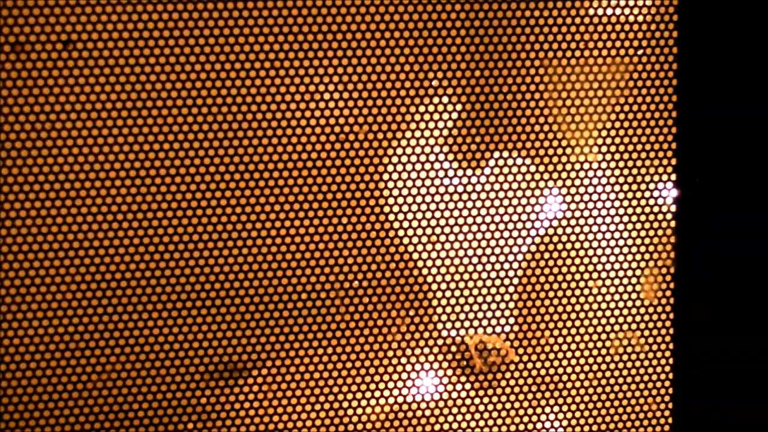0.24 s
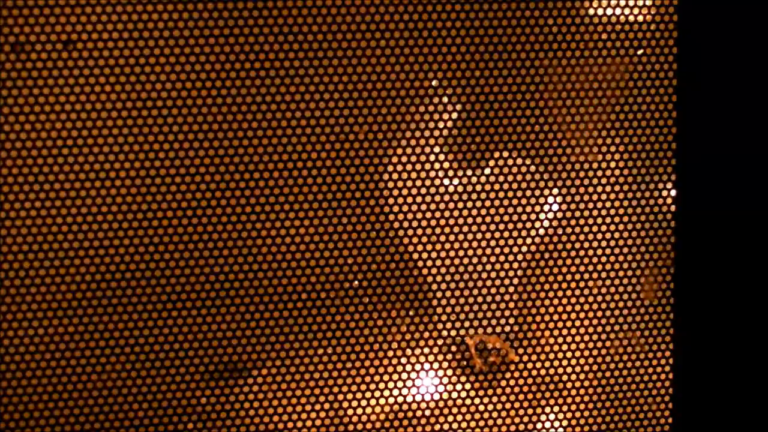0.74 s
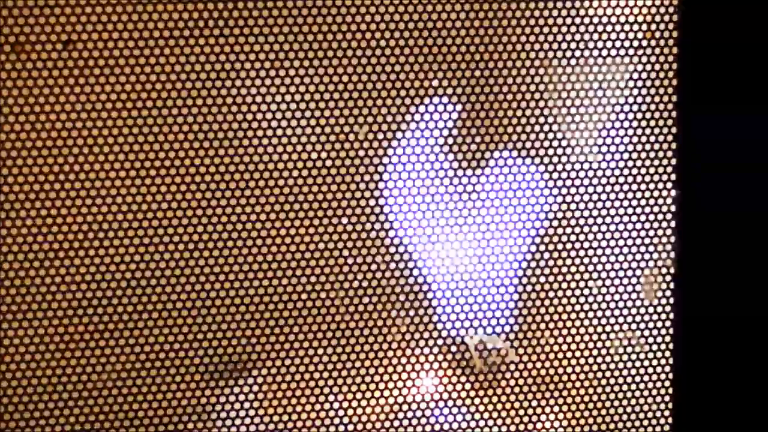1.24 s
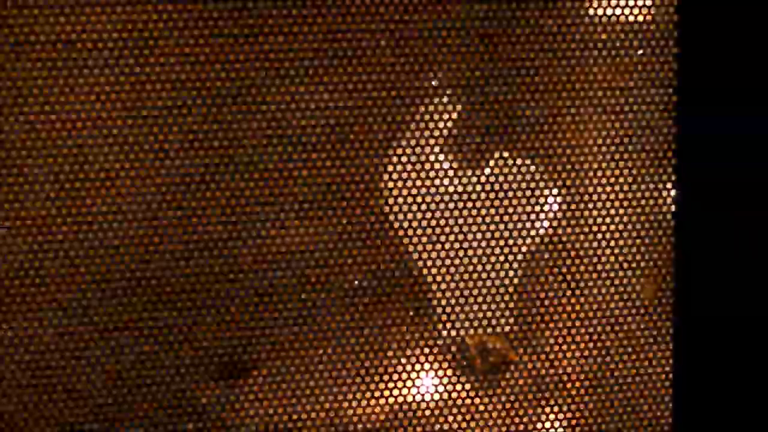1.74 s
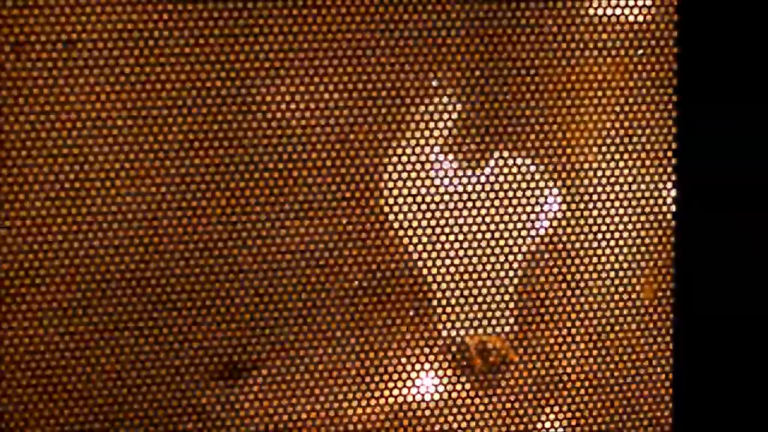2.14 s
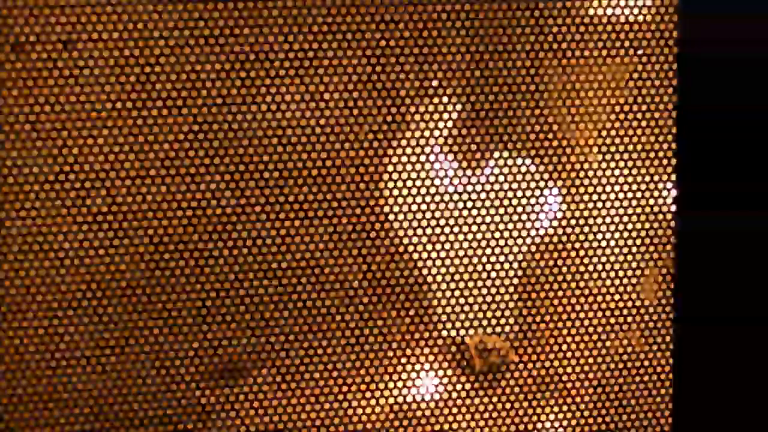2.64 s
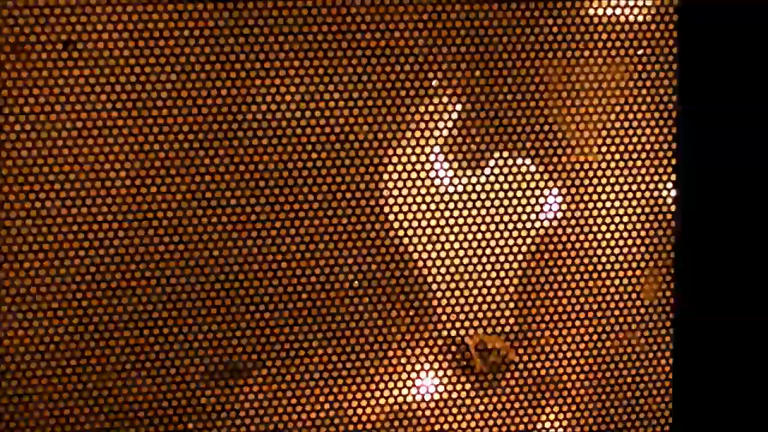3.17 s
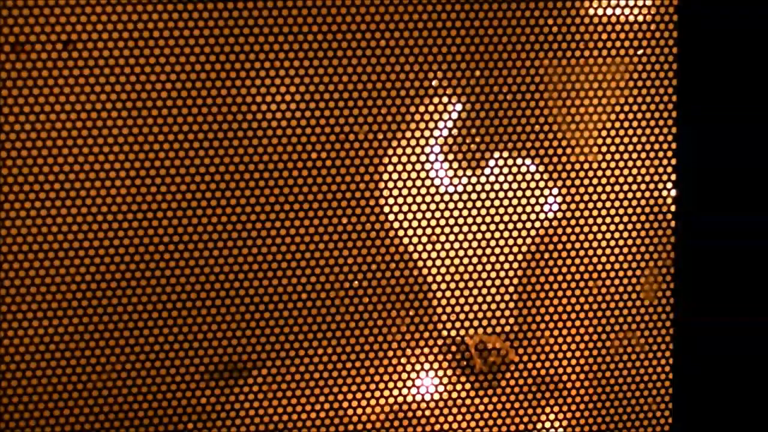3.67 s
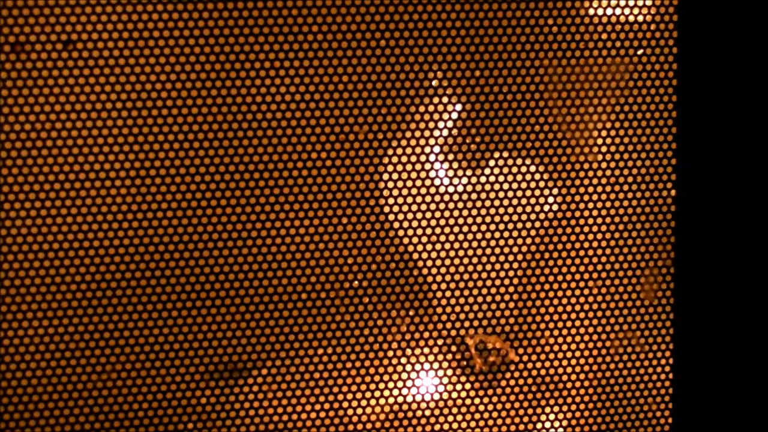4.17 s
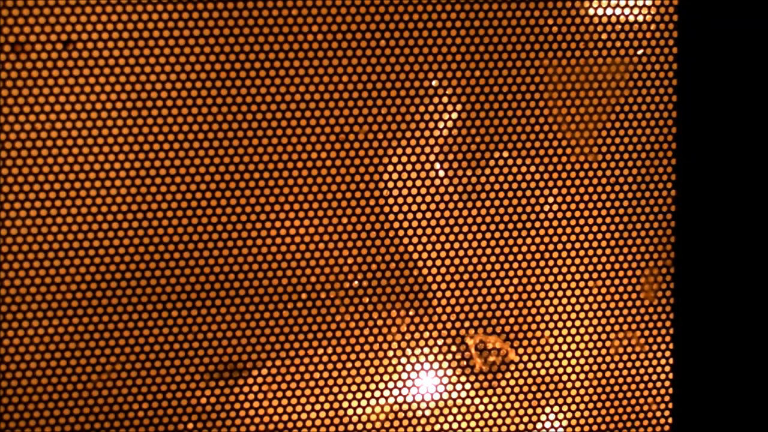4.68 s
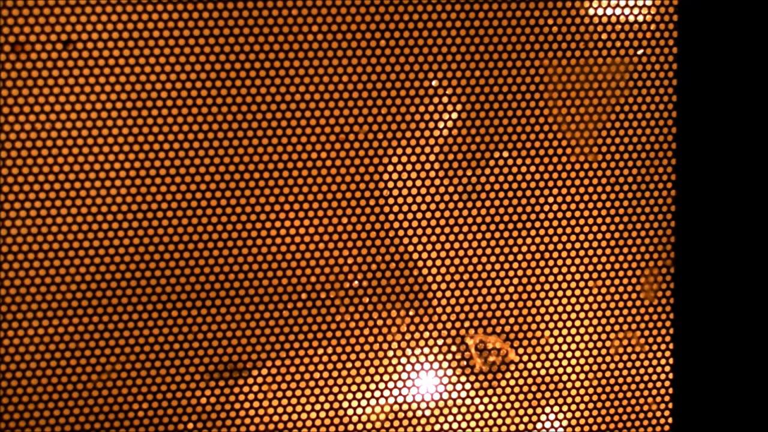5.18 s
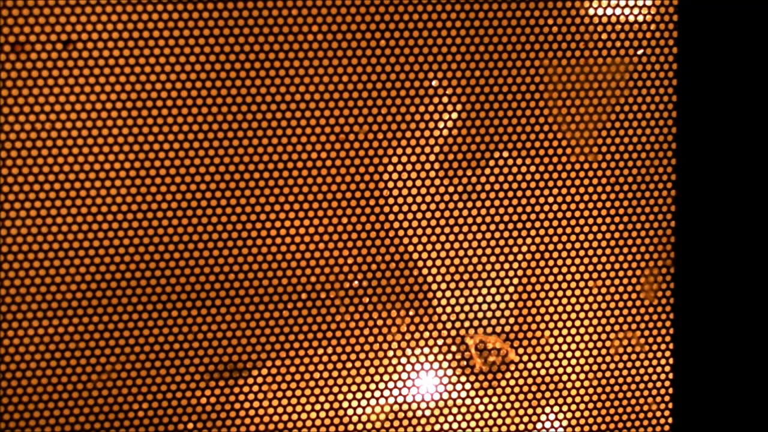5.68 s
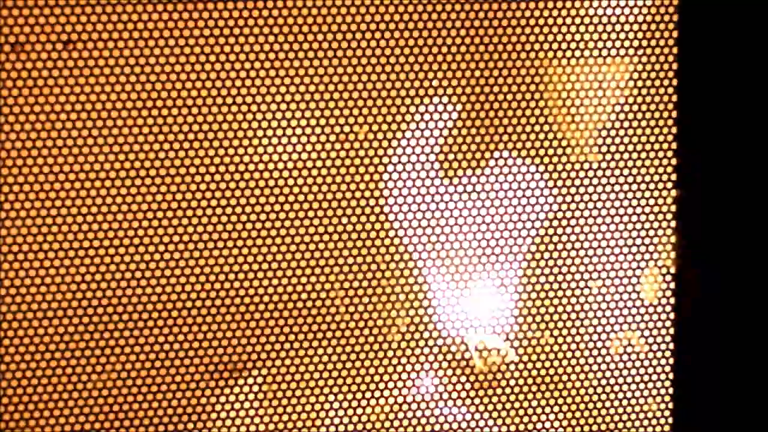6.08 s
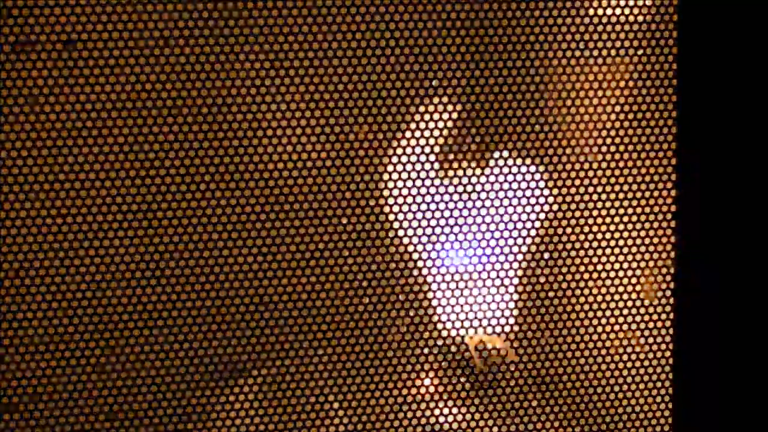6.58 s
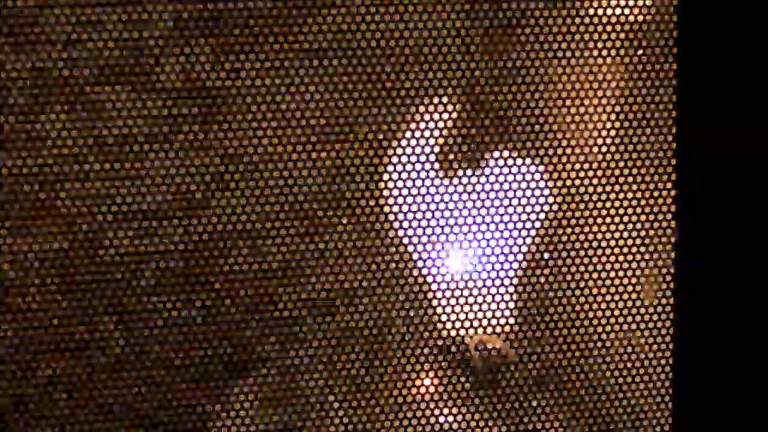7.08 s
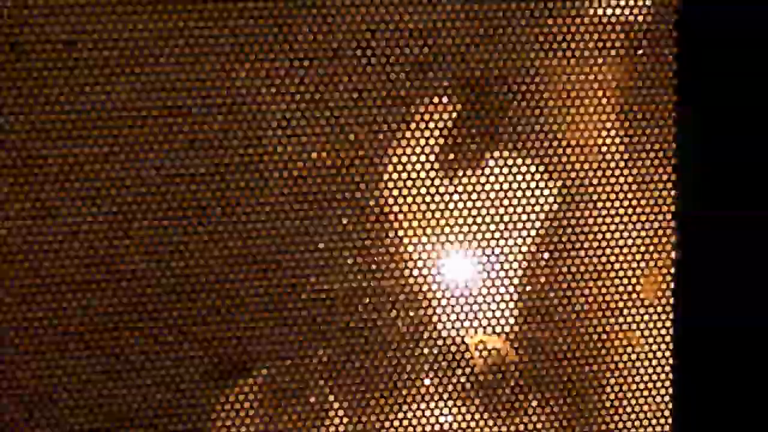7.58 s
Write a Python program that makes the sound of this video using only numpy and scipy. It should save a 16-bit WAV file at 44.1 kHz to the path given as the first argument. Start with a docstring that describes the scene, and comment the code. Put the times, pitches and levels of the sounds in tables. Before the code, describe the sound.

Close, stereo sound of a working microwave with a broken light bulb inside. Constant low electrical hum, fan tones and a faint whine sit under broad air noise. A glassy click leads into short bright buzzing zaps, then only the machine remains. Later the arcing returns more fiercely, spitting and sputtering in the small steel box while the hum dips, leaving the oven droning on.

```python
"""Close beside a running microwave oven with a broken light bulb inside.
The transformer hums as wavering sines, the fan whirrs as another set of tones, and its air rushes as shaped noise.
A snap rings the hot bulb: tiny fading bursts of noise through resonances. Then arcs burn in spells: combs
and random sparks sizzle in step with the hum, flare up roughly and weaken the hum, while a few harmonics sing
and uneven pushes make the plasma throb."""
import sys
import numpy as np
from scipy import signal
from scipy.fft import rfft, irfft, next_fast_len
from scipy.io import wavfile
from scipy.ndimage import uniform_filter1d, map_coordinates

SR = 44100
rng = np.random.default_rng(int(sys.argv[2]) if len(sys.argv) > 2 else 0)


def output_pcm(signal):
    """Save a mono or channel-first signal as 16-bit PCM at the path in sys.argv[1].

    Samples are clipped to [-1, 1] before scaling.
    """
    pcm = np.clip(np.atleast_2d(signal).T, -1, 1) * 32767
    wavfile.write(sys.argv[1], SR, np.round(pcm).astype(np.int16))


N = 344862  # samples in the scene
HUM_HZ = 240.05  # note of the hum, and rate of the arc's strikes
TOP_HZ = 15850  # nothing is kept from here upwards


def amp(db):
    """Turn decibels into a gain."""
    return 10 ** (np.asarray(db) / 20)


def unit(x):
    """Scale a sound to an rms of 1."""
    return x / np.sqrt(np.mean(x ** 2) + 1e-20)


def along(points, hz):
    """Read (frequency [Hz], value) points on a log frequency axis."""
    f, value = np.transpose(points)
    return np.interp(np.log(hz + 1), np.log(f + 1), value)


def curve(rows):
    """Join (time [s], value) rows into one value per sample."""
    return np.interp(np.arange(N) / SR, *np.transpose(rows))


def wobble(rate):
    """Draw a smooth random curve through `rate` random points a second."""
    knots = rng.standard_normal(int(N * rate / SR) + 4)
    steps = np.arange(len(knots) * 10) / 10
    smooth = map_coordinates(knots, [steps], mode="nearest")
    return np.interp(np.arange(N) * rate / SR, steps, smooth)


def filtered(x, response):
    """Multiply the spectrum of x by a response that depends on frequency."""
    n = x.shape[-1]
    m = next_fast_len(n + SR // 4)
    hz = np.fft.rfftfreq(m, 1 / SR)
    return irfft(rfft(x, m) * response(hz), m)[..., :n]


def coloured(x, spectrum):
    """Give x a (frequency [Hz], level [dB]) colour, at an rms of 1."""
    return unit(filtered(x, lambda hz: amp(along(spectrum, hz))))


def resonant(x, modes):
    """Ring x through (frequency [Hz], width [Hz], level [dB]) resonances, at an rms of 1."""
    def body(f):
        total = 0
        for k, (centre, width, db) in enumerate(modes):
            ring = 1j * f * width / (centre * centre - f * f + 1j * f * width)
            total = total + (-1) ** k * amp(db) * ring  # neighbours have opposite signs
        return total
    return unit(filtered(x, body))


def stereo(pair, alike):
    """Mix two unrelated signals to left and right with a given likeness at each frequency."""
    def mid_side(hz):
        turn = np.arccos(np.clip(along(alike, hz), 0, 1)) / 2
        return np.array([np.cos(turn), np.sin(turn)])
    mid, side = filtered(pair, mid_side)
    return np.array([mid + side, mid - side])


def tones(lines, base_hz, drift, waver_db):
    """Add sines on whole multiples of a note that share a slow drift [cycles] and waver in level."""
    cycles = base_hz * np.arange(N) / SR + drift * wobble(3)
    total = 0
    for k, db in lines:
        level = amp(db + waver_db * wobble(14))
        k = round(k)
        lag = k * k / 5  # cycles; higher harmonics lag more, so the sum is smooth and not peaky
        total = total + level * np.sqrt(2) * np.sin(2 * np.pi * (k * cycles - lag))
    return total


def held(spans, edge):
    """Hold each (start [s], end [s], gain) span, with edges of the given seconds."""
    gain = np.zeros(N)
    for start, end, value in spans:
        gain[round(start * SR):round(end * SR)] = value
    return np.abs(uniform_filter1d(gain, max(1, int(edge * SR))))


# spells of steady arcing: (start [s], end [s], sizzle level [dB], throb level [dB])
STEADY_ARCS = [(1.083, 1.317, -37, -59), (1.326, 1.388, -36.5, -61), (1.4, 1.478, -38, -49),
               (1.685, 1.801, -36, -69), (6.279, 6.448, -38.5, -44), (6.51, 6.633, -39, -42),
               (6.63, 7.23, -45, -44), (7.617, 7.768, -60, -48)]
# rough spits of the arc: (start [s], length [s], sizzle level [dB], throb level [dB])
FLARES = [(1.084, .04, -35.5, -52), (1.203, .022, -43, -47), (1.424, 0.056, -35, -47),
          (1.589, 0.0097, -37, -49), (1.681, 0.053, -36, -55), (1.741, 0.059, -33.5, -62),
          (6.372, 0.02, -33.5, -43), (6.42, 0.018, -38.5, -41.5), (6.7, 0.011, -36, -37),
          (6.725, .037, -33, -42), (6.8, .025, -35.5, -39), (6.84, .015, -41, -40),
          (6.862, 0.012, -37, -50), (6.938, 0.012, -32.5, -38), (6.971, 0.031, -32, -42),
          (7.057, 0.018, -41, -40), (7.091, 0.013, -37, -41), (7.117, 0.011, -37.5, -46),
          (7.179, 0.015, -38, -45), (7.204, 0.022, -46, -40), (7.349, 0.034, -31, -34.5),
          (7.414, 0.034, -42, -38)]
SIZZLE_COLUMN, THROB_COLUMN = 2, 3


def burning(edge, column):
    """Gains of the steady spells and of the flares, for their sizzle or their throb."""
    steady = held([(row[0], row[1], amp(row[column])) for row in STEADY_ARCS], edge)
    flare = held([(row[0], row[0] + row[1], amp(row[column])) for row in FLARES], edge)
    return steady, flare


CALM_ROUGH, FLARE_ROUGH = 0.22, 0.9  # share of random sparks in a steady arc and in a flare


def arcing(edge):
    """Strength of the arc, and its roughness, which rises with the flares' share of the power."""
    steady, flare = burning(edge, SIZZLE_COLUMN)
    strength = np.hypot(steady, flare)
    share = (flare / (strength + 1e-9)) ** 2
    rough = CALM_ROUGH + (FLARE_ROUGH - CALM_ROUGH) * share
    return strength, np.clip(rough, 0, 1)


# hum of transformer and casing: (multiple of the hum note, relative level [dB])
HUM_TONES = [(1, -32.5), (3, -17.5), (4, 1.5), (5, -15), (6, -11), (8, -17.5), (10, -19.5), (15, -33),
             (20, -35), (23, -34), (26, -33)]
# drone of the casing on twice the hum note, without load: (time [s], level [dB])
DRONE_LEVEL = [(0, -49), (5.4, -47.5), (5.9, -46), (6.4, -49), (7.25, -46.5), (7.55, -56.5), (7.82, -61)]
# fan motor: (multiple of the fan note, level [dB])
FAN_TONES = [(1, -58.5), (2, -49), (4, -55.5), (6, -70), (9, -49.5)]
# weaker tones of the vibrating panels: (frequency [Hz], level [dB])
PANEL_TONES = [(134, -85.5), (146, -82.5), (222, -77.5), (698, -67.5), (1627, -63), (2008, -71),
               (5281, -68)]
FAN_HZ, WHINE_HZ = 435.6, 4401
FULL_LOAD_DB, LOAD_SMOOTH_S = -35.5, 0.045  # arc strength that loads the oven fully; smoothing of the load
HUM_DB, HUM_SAG_DB = -41, 2.5  # gain of the hum, and its drop under full load
DRONE_SAG_DB = 8.5  # drop of the drone under full load


def oven():
    """Transformer hum that sags under the arc, an unsteady fan with its whine, and the panels that they shake."""
    load = np.minimum(arcing(LOAD_SMOOTH_S)[0] / amp(FULL_LOAD_DB), 1)
    hum = amp(HUM_DB - HUM_SAG_DB * load) * tones(HUM_TONES, HUM_HZ, drift=0.0057, waver_db=0.3)
    drone_gain = amp(curve(DRONE_LEVEL) - DRONE_SAG_DB * load)
    drone = drone_gain * tones([(2, 0)], HUM_HZ, drift=0.0067, waver_db=0.5)
    fan = tones(FAN_TONES, FAN_HZ, drift=0.061, waver_db=0.8)
    whine = tones([(1, -57)], WHINE_HZ, drift=0.23, waver_db=2.0)
    panels = sum(tones([(1, db)], hz, drift=0.28, waver_db=1.5) for hz, db in PANEL_TONES)
    return hum + drone + fan + whine + panels


# colour of the rushing air: (frequency [Hz], relative level [dB per Hz])
AIR_COLOUR = [(30, -32), (110, -33), (200, -25), (330, -13), (450, -6.5), (600, -11.5), (780, -3),
              (1120, -11), (1380, -7), (1560, -0.5), (2050, 0.5), (2900, -8.5), (5200, -8.5), (6300, -14.5),
              (7800, -14), (9000, -16.5), (15500, -18.5)]
# how alike the air is at left and right: (frequency [Hz], likeness [0 to 1])
AIR_ALIKE = [(100, .998), (145, 0.96), (200, 0.43), (300, 0.81), (600, 0.8), (950, 0.93), (2400, 0.97),
             (6000, .86), (15000, 0.4)]


def air():
    """The fan blows through the vents; echoes in the casing leave fine fixed ripples in the rush."""
    flow = rng.standard_normal((2, N)) * amp(0.63 * wobble(300))
    knots = rng.standard_normal(SR)
    def ripple(hz):
        return amp(1.4 * map_coordinates(knots, [80 * np.log(1 + hz / 1500)]))
    flow = filtered(flow, ripple)
    level = amp(-40.5 + 0.17 * wobble(14))
    return coloured(stereo(flow, AIR_ALIKE), AIR_COLOUR) * level


# how alike the cavity sounds at left and right: (frequency [Hz], likeness [0 to 1])
CAVITY_ALIKE = [(500, 0.89), (3000, 1), (8000, 0.85), (13000, 0.72)]


def cavity(x, t60, direct):
    """The steel box: a direct sound, then dense echoes that differ between left and right."""
    t = np.arange(SR // 5) / SR
    echoes = rng.standard_normal((2, len(t))) * amp(-60 * t / t60)  # 60 dB down after t60 seconds
    echoes /= np.linalg.norm(echoes, axis=1, keepdims=True)
    echoes[0, 0] += direct
    echoes /= np.linalg.norm(echoes, axis=1, keepdims=True)
    boxed = signal.fftconvolve(x[None], echoes, axes=1)[:, :N]
    return stereo(boxed, CAVITY_ALIKE)


# the snap and its after-cracks: (time [s], relative ping level [dB], relative knock level [dB])
CRACKS = [(0.9344, -20.5, -42), (0.9355, -23.5, -17), (0.937, -25, -42), (0.939, -22, -34),
          (0.944, -32, -43)]
# ringing of the bulb: (frequency [Hz], width [Hz], relative level [dB])
PING_MODES = [(11300, 410, 5), (10300, 300, -5), (8300, 600, -12), (5990, 98, 2), (13300, 460, -19)]
# knocking of the box: (frequency [Hz], width [Hz], relative level [dB])
KNOCK_MODES = [(1510, 34, 10.5), (2100, 300, -6), (2660, 280, 7), (4500, 1300, -20)]


def snap():
    """A quick run of tiny cracks rings the bulb and knocks the box: fading bursts of resonant noise."""
    t = np.arange(N) / SR
    total = np.zeros(N)
    for column, modes in enumerate([PING_MODES, KNOCK_MODES], 1):
        fades = np.zeros(N)
        for row in CRACKS:
            age = t - row[0]
            fades += amp(row[column] - 60 * np.abs(age) / 0.012) * (age >= 0)  # 60 dB down in 12 ms
        total += fades * resonant(rng.standard_normal(N), modes)
    # so small a source radiates little bass
    high_pass = signal.butter(2, 1400, "high", fs=SR, output="sos")
    total = signal.sosfilt(high_pass, total)
    return amp(0.5) * cavity(total, t60=0.067, direct=1.8)


def ignition(surge_db, fade):
    """A gain that leaps as each flare catches, and then settles."""
    t = np.arange(SR // 10) / SR
    leap = np.zeros(N + SR)
    for start, *_ in FLARES:
        leap[round(start * SR):][:len(t)] = np.exp(-t / fade)
    return amp(surge_db * leap[:N])


# colour of the first thin arcs: (frequency [Hz], relative level [dB per Hz])
THIN_COLOUR = [(500, -37), (1800, -12), (2600, -5), (3100, -26), (4400, -8), (5250, -5), (6100, -13.5),
               (7000, -1), (8300, 2.5), (8750, -5), (9500, -1.5), (11000, -8.5), (13000, -19),
               (15500, -5.5)]
# colour of the later plasma ball: (frequency [Hz], relative level [dB per Hz])
BALL_COLOUR = [(500, -29), (1800, -19), (3000, -9), (4400, -3), (5400, -11), (6100, -10), (7700, 3),
               (8800, -5), (9700, 0), (11000, -5), (11900, 1.5), (12700, -8), (15500, -6)]
# sharp resonances that the strikes excite: (frequency [Hz], width [Hz], relative level [dB])
RING_MODES = [(2655, 75, 2), (3600, 61, -2), (4780, 62, 4), (5280, 170, -2), (5520, 80, 4), (6930, 100, 0),
              (7610, 80, 3), (8240, 210, 3), (9500, 210, 2.5), (10120, 220, 1.5), (12050, 300, -8)]
PLASMA_S = 4  # from this time on, arcs have the sound of the plasma ball


def sizzle():
    """The arc re-strikes every hum cycle: alike each time when calm, scattered when rough."""
    t = np.arange(N) / SR
    strength, rough = arcing(edge=0.0022)
    # each strike comes a little early or late, which blurs the highest harmonics
    phase = (HUM_HZ * t + 0.0081 * wobble(120)) % 1
    burn = np.exp(-phase / 0.57)
    # calm strikes repeat one wave, a comb of hum harmonics
    grid = np.arange(SR // 16)
    harmonics = np.exp(2j * np.pi * rng.random(int(TOP_HZ / HUM_HZ)))
    one_strike = irfft(harmonics, len(grid))
    comb = unit(np.interp(phase, grid / len(grid), one_strike))
    # rough strikes are a spray of random sparks
    spark_gain = amp(4.0 * wobble(2500) + 2.3 * wobble(240))
    sparks = unit(rng.standard_normal(N) * spark_gain)
    strikes = burn * (np.sqrt(1 - rough) * comb + np.sqrt(rough) * sparks)
    # the resonances answer 5 ms after the strike
    rings = resonant(np.roll(strikes, SR // 200), RING_MODES)
    thin = amp(1.0) * coloured(strikes, THIN_COLOUR) + amp(-4.0) * rings
    ball = amp(-2.5) * coloured(strikes, BALL_COLOUR) + amp(-2.0) * rings
    ball = ball * amp(0.96 * wobble(90))
    arc = np.where(t < PLASMA_S, thin, ball)
    arc = arc * strength * ignition(surge_db=2.5, fade=0.0052)
    return amp(-0.87) * cavity(arc, t60=0.076, direct=1.08)


# hum harmonics that fall on sharp resonances: (multiple of the hum note, relative level [dB])
SINGING_TONES = [(15, -8.5), (20, -4), (23, -3.5)]


def singing():
    """While the arc burns, a few harmonics build up and sing; they follow its strength only loosely."""
    level = arcing(edge=0.011)[0] ** 0.46
    return amp(-32) * level * tones(SINGING_TONES, HUM_HZ, drift=0.0015, waver_db=2.5)


# low resonances of the cavity: (frequency [Hz], width [Hz], relative level [dB])
THROB_MODES = [(518, 176, 2.5), (762, 68, 6)]
# colour of the flutter: (frequency [Hz], relative level [dB per Hz])
FLUTTER_COLOUR = [(30, -26), (100, -29), (140, -8.5), (190, -34), (300, -20), (450, 7.5), (580, -11),
                  (760, 0.5), (1000, -5), (2000, -43)]


def throb():
    """The plasma swells with each strike: uneven pushes of air that boom in the cavity, with some flutter."""
    level = np.hypot(*burning(0.0045, THROB_COLUMN))
    beats = np.arange(int(N / SR * HUM_HZ) - 1) + 1 / 2
    places = np.round(beats / HUM_HZ * SR).astype(int)
    pushes = np.zeros(N)
    pushes[places] = amp(2.6 * rng.standard_normal(len(beats)))
    boom = resonant(pushes * amp(1.8 * wobble(23)), THROB_MODES)
    flutter = coloured(rng.standard_normal(N), FLUTTER_COLOUR)
    return level * (amp(0.5) * boom + amp(-9.5) * flutter)


def scene():
    """The running oven with the arcing bulb inside."""
    return oven() + air() + snap() + sizzle() + singing() + throb()


def record(dry):
    """Keep only what lies below the band limit."""
    return filtered(dry, lambda hz: hz < TOP_HZ)


dry = scene()
out = record(dry)
output_pcm(out)
```